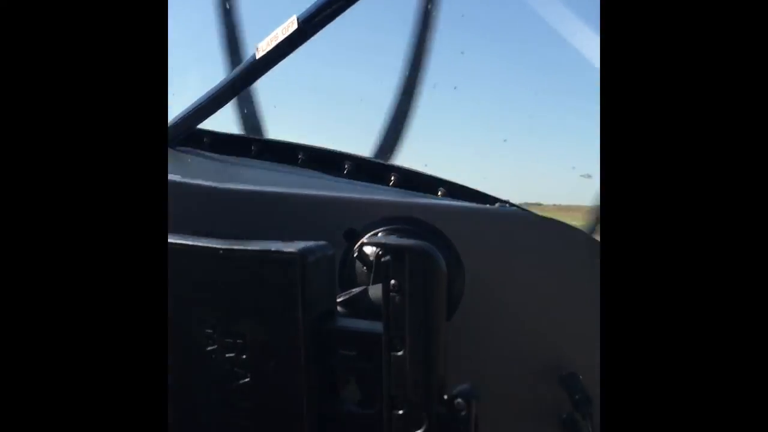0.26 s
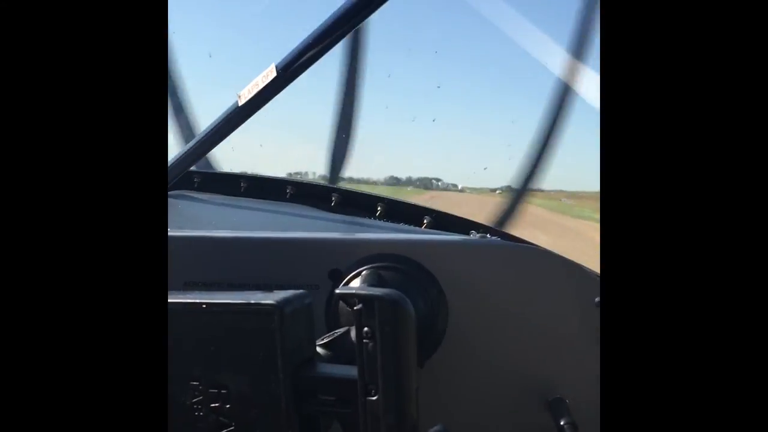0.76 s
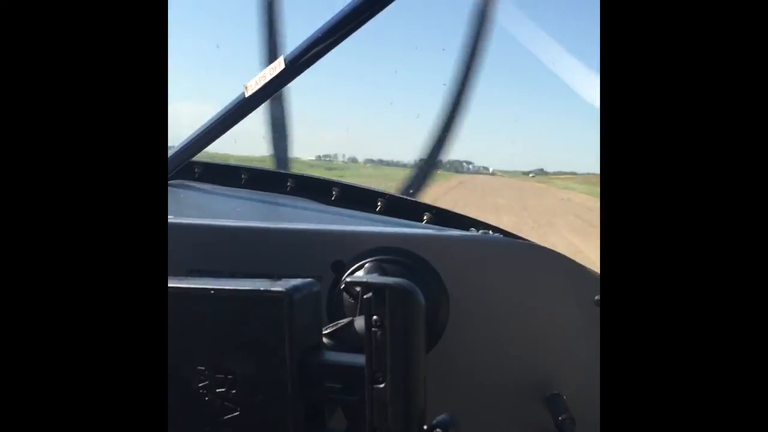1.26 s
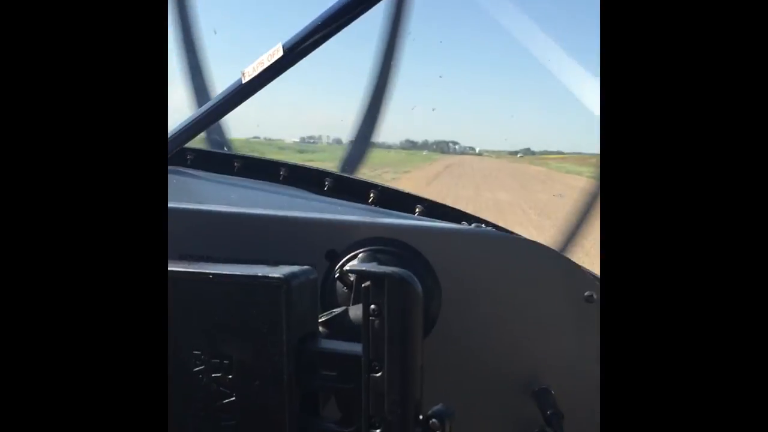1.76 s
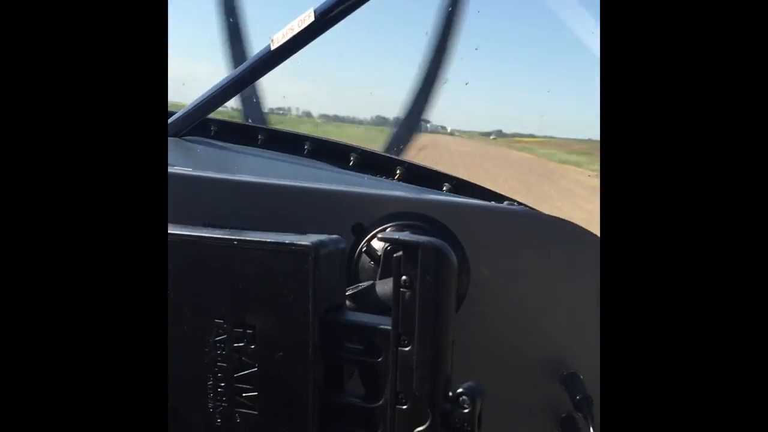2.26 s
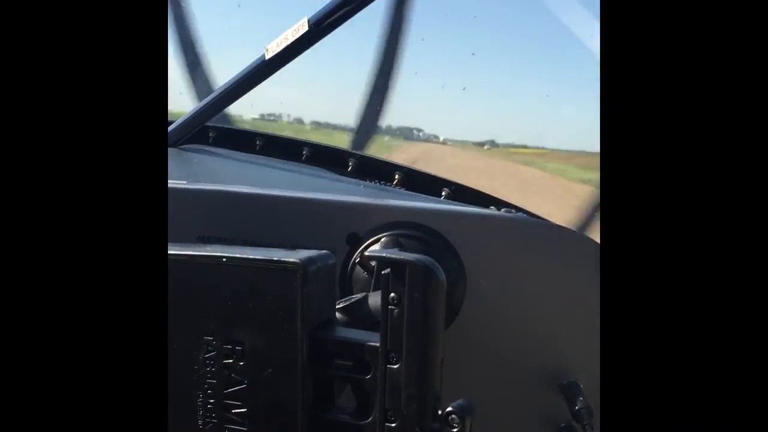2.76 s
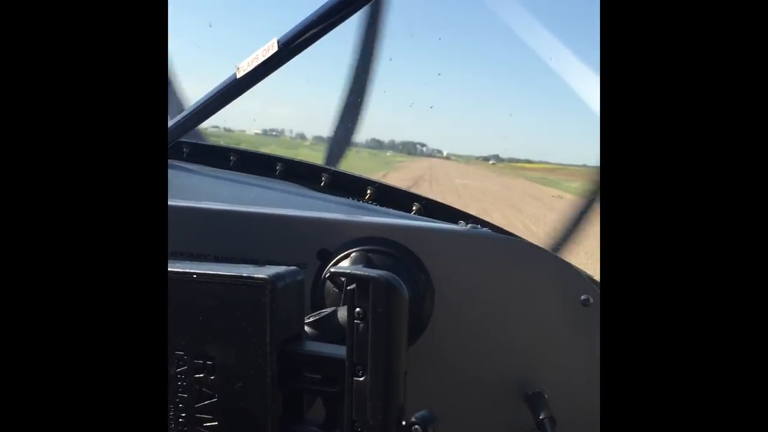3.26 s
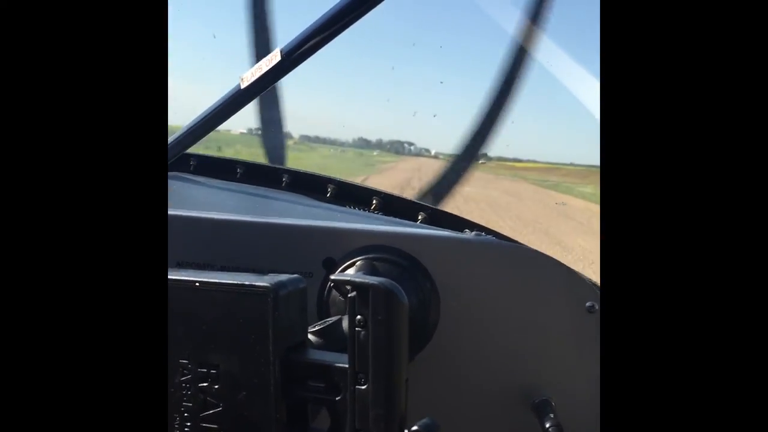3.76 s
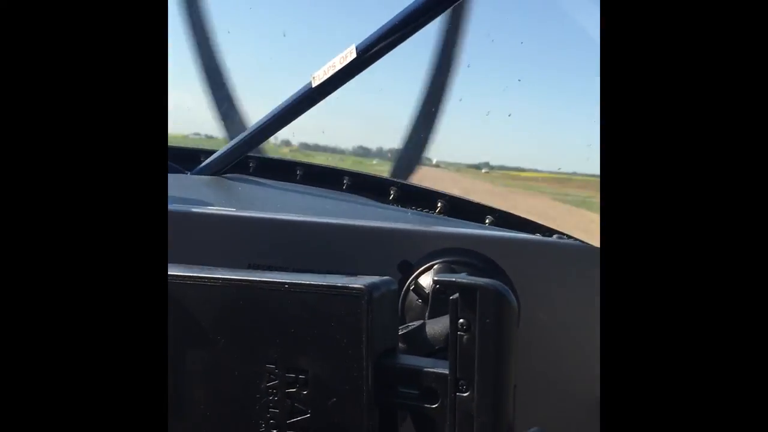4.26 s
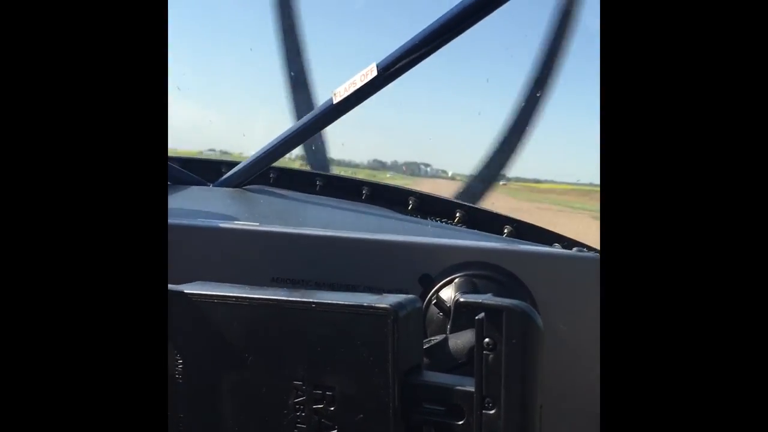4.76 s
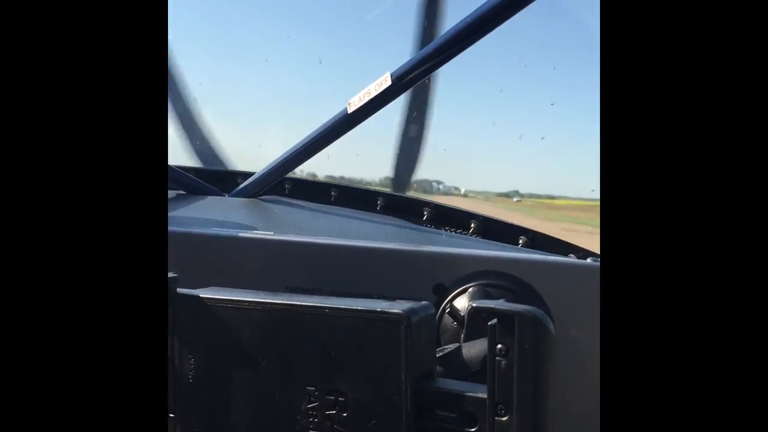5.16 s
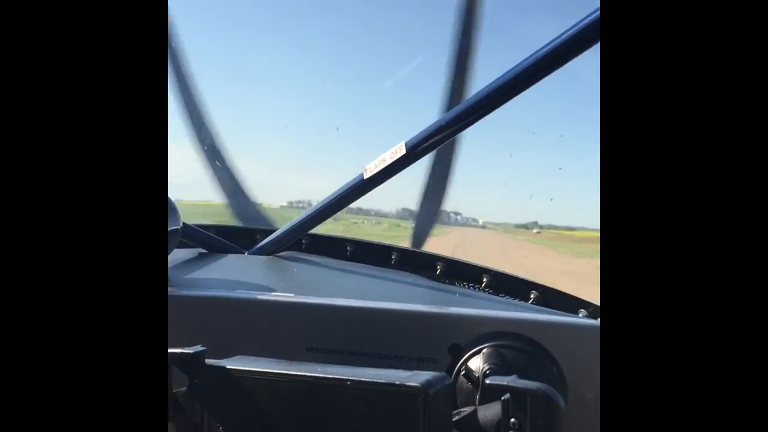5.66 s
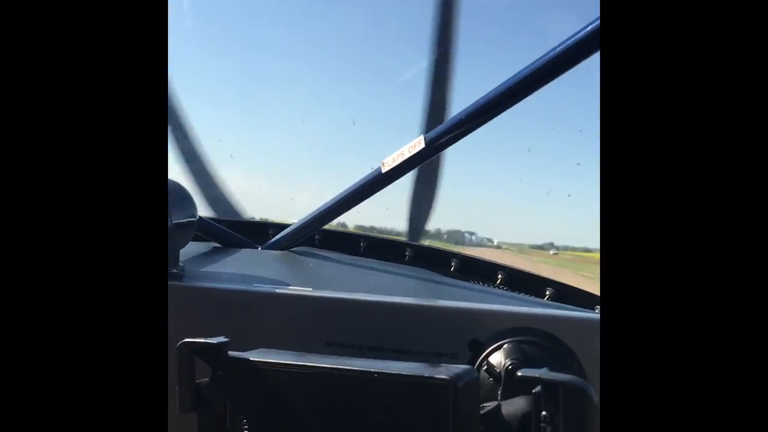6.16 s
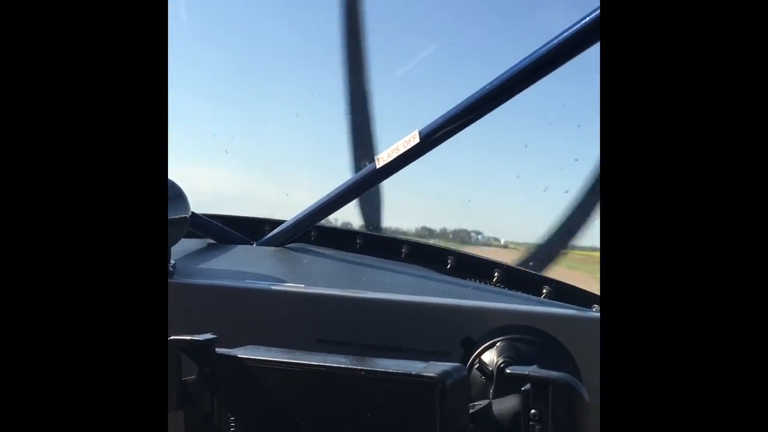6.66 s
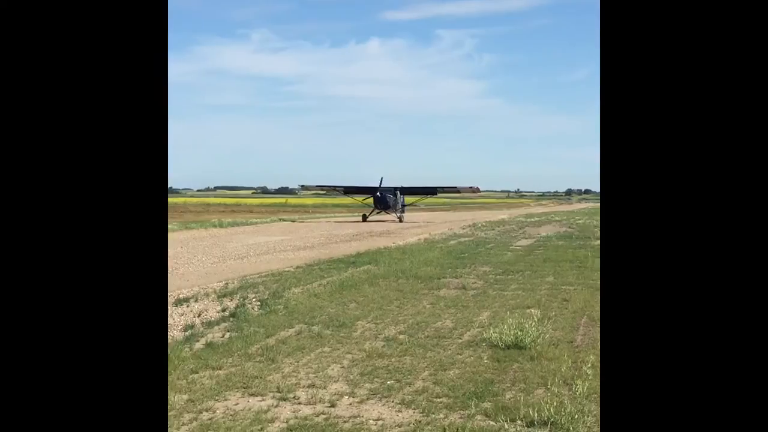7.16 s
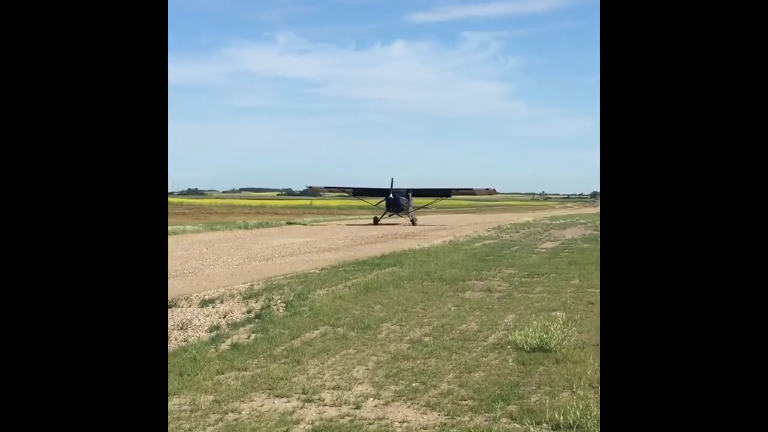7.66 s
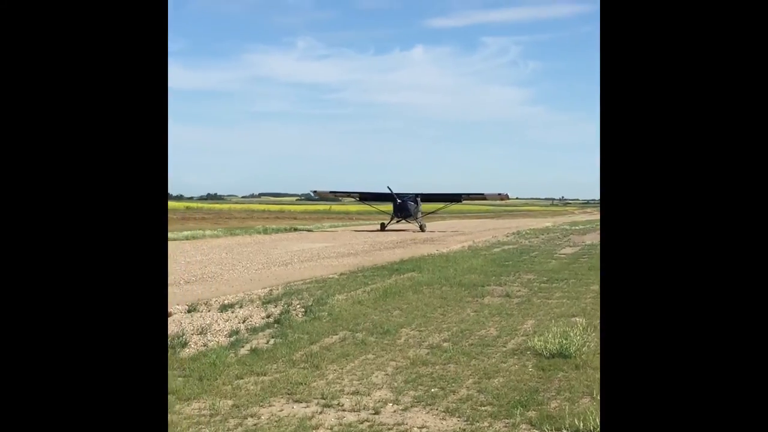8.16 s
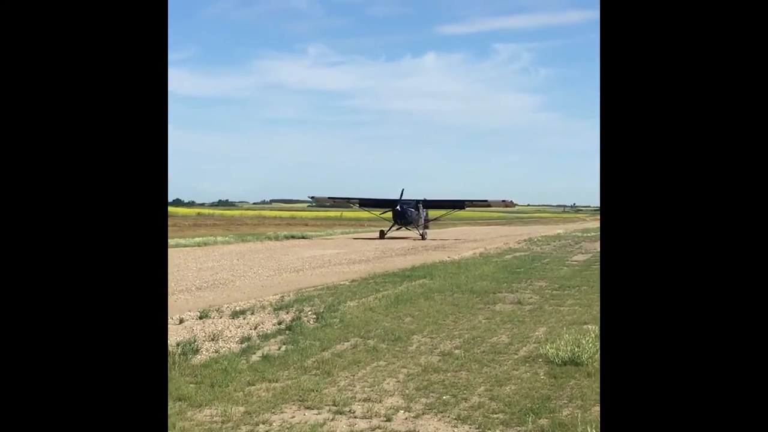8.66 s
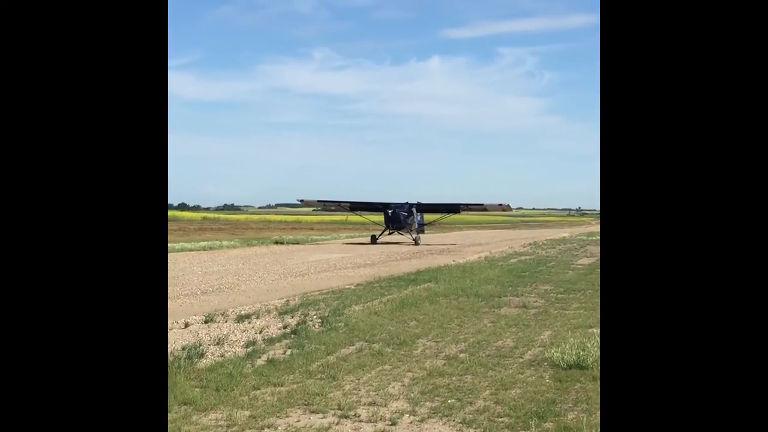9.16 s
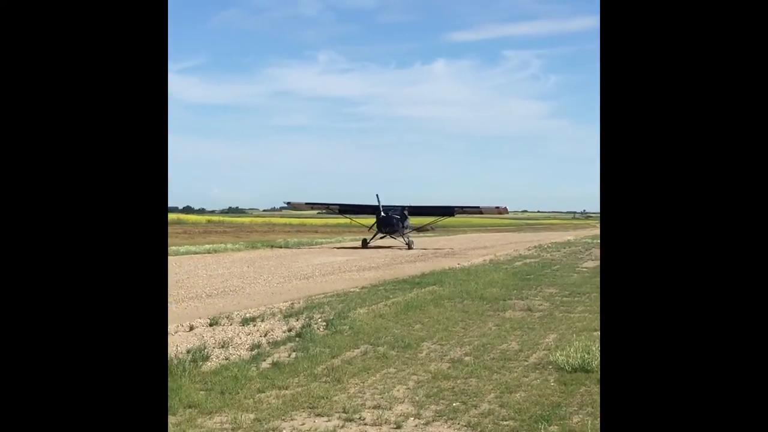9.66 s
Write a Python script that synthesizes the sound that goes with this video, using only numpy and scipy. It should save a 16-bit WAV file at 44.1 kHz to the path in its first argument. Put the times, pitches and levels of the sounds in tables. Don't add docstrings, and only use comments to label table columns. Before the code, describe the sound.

Inside a small propeller plane, a loud low engine drone falls in pitch over four seconds and settles rough, with buffeting, air hiss, a leaking door seal and sharp panel rattles. At about seven seconds it cuts to a much quieter open field: the plane idles closer, exhaust puttering and cowling clattering, stones pinging, wind and a heavy microphone bump.

```python
import sys
import numpy as np
from scipy import signal
from scipy.fft import rfft, irfft, next_fast_len
from scipy.io import wavfile
from scipy.ndimage import uniform_filter1d

SR = 44100
rng = np.random.default_rng(int(sys.argv[2]) if len(sys.argv) > 2 else 0)


def ratio_of_db(decibels):
    return 10 ** (np.asarray(decibels, float) / 20)


def generate_wav(signal):
    frames = np.transpose(np.atleast_2d(signal))
    scaled = np.clip(frames, -1, 1) * 32767
    pcm = np.round(scaled).astype(np.int16)
    wavfile.write(sys.argv[1], SR, pcm)


N = 436590
CUT_S = 7.126
STEP = 64

# time in seconds, shaft speed in Hz, firing tone level in dB.
ENGINE = [(0.0, 54.66, -19), (1.4, 54.28, -16.5), (1.92, 48.62, -20.5), (2.21, 44.82, -16.5),
          (2.71, 43.12, -14.5), (3.22, 42.33, -13.5), (3.46, 40.07, -14.5), (3.89, 35.75, -12.5),
          (4.11, 35.2, -15), (4.71, 34.85, -14.5), (5.32, 32.92, -16), (5.89, 32.4, -14),
          (6.01, 32.48, -14.5), (7.1, 31.58, -16.5)]
# time in seconds, nearness (about 0 far to 1 near, briefly beyond either end).
APPROACH = [(7.14, -.3), (7.3, 0.15), (7.7, 0.3), (8.1, 0.76), (8.4, 0.82), (8.7, 1.1), (9.1, 0.82),
            (9.5, 0.76), (9.9, 0.76)]
# centre in seconds, length in seconds, lift in dB.
BLIPS = [
    (7.4, 0.22, 3.5),
    (8.68, 0.49, 12),
    (9.43, .12, 6.5),
    (9.82, .3, 4),
]


def evened(x):
    return x / np.sqrt(np.mean(x ** 2) + 1e-20)


def read(points, hz):
    f, value = np.transpose(points)
    return np.interp(np.log(hz + 1), np.log(f + 1), value)


def columns(rows, t):
    s, *values = np.transpose(rows)
    return [np.interp(t, s, v) for v in values]


def add(mix, s, sound):
    part = mix[round(s * SR):][:len(sound)]
    part += sound[:len(part)]


def swells(rows, t):
    return sum(height * np.exp(-np.abs(2 * (t - s) / length) ** 3) for s, length, height in rows)


def bells(modes, hz):
    return sum(db / (1 + (2 * (hz - f) / width) ** 2) for f, width, db in modes)


def band(x, low_hz, high_hz):
    edges_hz = [low_hz, min(high_hz, .49 * SR)]
    return signal.sosfilt(signal.butter(2, edges_hz, "bandpass", fs=SR, output="sos"), x)


def wander(t, slow_hz, fast_hz):
    hz = np.geomspace(slow_hz, fast_hz, 16)[:, None]
    coarse_s = np.arange(0, t[-1] + .01, .002)
    sines = np.sin(2 * np.pi * (hz * coarse_s + rng.random(hz.shape))) / np.sqrt(hz)
    return np.interp(t, coarse_s, evened(sines.sum(0)))


def noise(colour_db, size, patchy_db, flicker_db):
    hop = size // 4
    frames = N // hop + 5
    hz = np.fft.rfftfreq(size, 1 / SR)[:, None]
    t = np.arange(frames) * hop / SR
    a, b, patches = rng.standard_normal((frames, len(hz), 3)).T
    patches = uniform_filter1d(patches, size=8, axis=0)
    patches = evened(uniform_filter1d(patches, size=12, axis=1))
    level_db = colour_db(hz, t) + patchy_db * patches + flicker_db * wander(t, 3, 70)
    spectra = (a + 1j * b) * ratio_of_db(level_db)
    return evened(signal.istft(spectra, nperseg=size, noverlap=size - hop)[1][:N])


def rings(rows, rise_s):
    out, t = np.zeros(N), np.arange(22000) / SR
    for s, db, hz, t60_s in rows:
        envelope = ratio_of_db(db - 60 * t / t60_s) * np.minimum(t / rise_s, 1)
        add(out, s, envelope * np.sin(2 * np.pi * hz * t))
    return out


def orders(levels, turns):
    fine = np.arange(N) / STEP
    out = np.zeros(N)
    for k, db in levels:
        level = np.interp(fine, np.arange(len(db)), ratio_of_db(db))
        out += level * np.sin(2 * np.pi * (k * turns + rng.random()))
    return out


def field_hiss():
    return ratio_of_db(-77.5) * evened(band(band(rng.standard_normal(N), 1500, 7500), 900, 8500))


def field_wind(t):
    # frequency in Hz, level in dB per Hz.
    wind_spectrum = [(25, -32), (46, 2), (140, -1), (280, -5.5), (345, -28), (520, -35), (8500, -43.5),
                     (15500, -49)]
    rise_db = 11 * np.clip((t - CUT_S) / 1.05, 0, 1)
    wind_db = -47.5 + rise_db + 1.1 * wander(t, 1.2, 8.7) - 0.18 * swells(BLIPS, t)

    def colour_db(hz, t):
        return read(wind_spectrum, hz) + bells([(405, 40, 22)], hz) * np.clip(1.5 * (8.3 - t), .3, 1)
    return ratio_of_db(wind_db) * noise(colour_db, size=2048, patchy_db=.8, flicker_db=1.2)


def insect(t):
    # phrase centre in seconds, length in seconds, peak in dB.
    insect_phrases = [
        (7.9, .5, -65),
        (8.28, .34, -56),
        (8.55, .2, -65),
        (9.2, 0.98, -62),
    ]
    start_s, period_s = 7.557, .0762
    third_s = period_s / 3
    since_s = t - start_s - .003 + third_s / 2
    strong = np.where(since_s % period_s < third_s, 1, .33)
    ticks = strong * np.exp(-((since_s % third_s - third_s / 2) / .0062) ** 2)
    grit = rng.standard_normal(N)
    scratch = .6 * evened(band(grit, 11300, 13600)) + evened(band(grit, 10600, 15500))
    scratch += .8 * evened(band(grit, 8200, 9300))
    level = swells([(s, length_s, ratio_of_db(db)) for s, length_s, db in insect_phrases], t)
    level = level + ratio_of_db(-86) * (t > start_s)
    return ratio_of_db(-3.5 + 1.5 * wander(t, 2, 13)) * level * ticks * scratch


def skin_buffet(t, gust_db):
    # frequency in Hz, level in dB per Hz.
    buffet_spectrum = [(25, -32), (40, -43), (55, 6), (66, 3), (80, -5), (105, 5), (135, -1), (165, 4),
                       (200, -6), (250, -5), (300, -6.5), (345, -18.5), (450, -21), (700, -56.5)]

    def colour_db(hz, t):
        power = np.clip(columns(ENGINE, t)[0] / 9 - 5, 0, 1)
        return read(buffet_spectrum, hz) + bells([(66, 8.4, 5.4)], hz) * power
    return ratio_of_db(-23 + 0.77 * t + gust_db) * noise(colour_db, size=2048, patchy_db=1.6, flicker_db=0.9)


def slipstream(t, gust_db, slip):
    # frequency in Hz, level in dB per Hz.
    hiss_spectrum = [(250, -17), (350, -1), (420, -7), (480, -8.5), (620, -4), (800, -8.5), (950, -6),
                     (1330, -11.5), (2200, -12.5), (2710, -16), (4500, -20), (8350, -26.5), (11500, -31.5),
                     (15500, -39)]
    flare_db = np.clip((t - 2.413) / .15, 0, 1)
    slip_db = 2.5 * slip + 1.5 * (t < 0.31)
    hiss_db = -33 + 0.1742 * t + flare_db + 0.33 * gust_db + slip_db

    def colour_db(hz, t):
        flutter = np.clip((t - 2.2) / 1.8, 0, 1) * (1 + .35 * wander(t, 4, 25))
        panel_db = bells([(760, 270, 3.0)], hz) * flutter
        octaves_up = np.clip(np.log2(hz / 6500 + 1e-3), 0, 1.2)
        return read(hiss_spectrum, hz) + panel_db + 5 * np.log2(columns(ENGINE, t)[0] / 40) * octaves_up
    return ratio_of_db(hiss_db) * noise(colour_db, size=512, patchy_db=1.0, flicker_db=0.4)


def seal_leak(t, gust_db, slip):
    leak_db = -51 - .3 * gust_db + 7 * slip + 1.4 * wander(t, 1.5, 15)
    return ratio_of_db(leak_db) * evened(band(rng.standard_normal(N), 7150, 8880))


def cabin_air(t):
    # centre in seconds, length in seconds, strength in dB.
    airframe_gusts = [(.3, 0.09, 4), (.41, 0.021, 13.5), (1.1, 0.17, 2.5), (1.75, 0.17, 0.5),
                      (2.6, 0.43, 3), (2.89, 0.094, 3.5), (3.56, .1, 3.5), (3.89, 0.074, 5.5),
                      (4.23, 0.14, 1.5), (4.5, .1, -3), (5.42, 0.086, 3), (5.81, 0.14, 3.5),
                      (5.99, 0.074, 6), (6.49, 0.089, 3), (6.6, .1, 4.5), (6.92, 0.092, 1.5),
                      (7.09, 0.061, 4.5)]
    gust_db = swells(airframe_gusts, t)
    slip = np.clip(.5 + (1 - t) / 0.68, 0, 1)
    return skin_buffet(t, gust_db) + slipstream(t, gust_db, slip) + seal_leak(t, gust_db, slip)


def rattles():
    # start in seconds, peak in dB, level of the lower part in dB.
    rattle_events = [(0.3546, -22, -24), (0.409, -40, -22.5), (0.9314, -25, -25), (0.956, -36, -32),
                     (1.4346, -28, -25), (1.9545, -26, -25), (2.5274, -37, -29), (2.5701, -36, -24.5),
                     (3.1486, -30, -24), (4.346, -38, -32), (4.5309, -29, -30), (4.8228, -40, -35),
                     (4.9789, -39, -40), (5.7513, -36, -26), (5.8137, -33, -27), (6.02, -37, -24),
                     (6.0494, -25, -31), (6.243, -36, -35), (6.4967, -36, -37), (6.5301, -38, -27),
                     (6.6219, -41, -35)]
    out, t = np.zeros(N), np.arange(2600) / SR
    for s, db, low_db in rattle_events:
        grit = rng.standard_normal((2, len(t)))
        bright = ratio_of_db(db - 7.5) * evened(band(grit[0], 6500, 15500)) * np.exp(-t / 0.0044)
        buzz = ratio_of_db(low_db - 6) * evened(band(grit[1], 1200, 5900)) * np.exp(-t / 0.0098)
        add(out, s, (bright + buzz) * np.minimum(t / 0.00093, 1))
    return out


def panel_knocks():
    return rings([(0, -28.5, 429, 1.3), (.257, -21.5, 710, .14), (.285, -20, 786, .1),
                  (.283, -18, 400, 0.11), (.311, -23, 730, 0.15), (.404, -24, 630, 0.076),
                  (.404, -26, 800, .07), (.408, -28, 1940, 0.074), (.408, -23, 1320, 0.046),
                  (.94, -20, 640, .08), (4.88, -24, 729, 0.15), (4.93, -24, 710, 0.14),
                  (5.78, -20, 724, .1), (5.95, -25, 760, 0.17)], rise_s=.007)


def microphone_bumps():
    return rings([(7.59, -25.5, 62, .12), (8.152, -24, 444, 0.043), (8.154, -24, 66, 0.17),
                  (8.155, -22.5, 284, 0.078), (8.156, -32, 640, 0.047), (8.1605, -12.5, 150, 0.07),
                  (8.1705, -10, 143, 0.086), (8.185, -18, 420, 0.031), (8.188, -32, 655, .04),
                  (8.194, -15, 111, 0.06), (9.44, -21, 68, 0.14)], rise_s=0.0051)


def wheel_pings():
    return rings([(7.163, -43, 772, 0.053), (7.228, -47, 760, 0.067), (7.295, -47, 760, .05),
                  (7.39, -50, 950, .05), (7.422, -43, 770, .06), (7.33, -56, 2700, .04),
                  (7.46, -57, 2720, .05), (7.48, -51, 1250, 0.056), (7.643, -54, 1100, 0.036),
                  (7.708, -40, 1150, .04), (7.795, -47, 1340, .04), (7.867, -40, 1330, .04),
                  (8.933, -35, 1350, 0.043)], rise_s=0.0014)


def cowling_clatter(t, turns):
    # frequency in Hz, level in dB per Hz.
    clatter_spectrum = [(210, -37), (350, -8), (1230, -8.5), (1350, -6), (1480, -9.5), (2710, -7.5),
                        (4430, -13), (6080, -16.5), (7840, -23.5), (13200, -64), (15500, -58)]
    # frequency in Hz, width in Hz, lift in dB.
    cowling_modes = [(770, 27, 6), (1350, 36, 15.5), (1864, 94, 8), (2720, 82, 7), (3500, 180, 4.5),
                     (4480, 120, -9), (4730, 90, 7), (5000, 120, -6), (5400, 90, 2), (6160, 95, 9),
                     (6760, 90, 9.5), (7900, 500, -5), (8700, 700, 10.5)]

    def colour_db(hz, t):
        near = columns(APPROACH, t)[0]
        opened_s = np.maximum(t - CUT_S, 0)
        treble_db = -19.5 + 18.5 * np.tanh((opened_s / 1.38 * 1.3) ** 1.12)
        octaves_up = np.clip(np.log2(hz / 1000 + 1e-3) / 1.07, 0, 1.4)
        air_db = -30 * np.log2(np.maximum(hz, 9000) / 9000)
        slope_db = read(clatter_spectrum, np.minimum(hz, 9000)) + air_db
        peaks_db = bells(cowling_modes, hz) * np.clip(0.59 + .5 * near, 0, 1.2)
        return slope_db + peaks_db + 6.5 * near + treble_db * octaves_up
    clatter = noise(colour_db, size=1024, patchy_db=1.9, flicker_db=1.2)
    near_rms = np.sqrt(np.mean(clatter[t > 8.5] ** 2))
    throb = 1 + .15 * np.cos(2 * np.pi * turns)
    return clatter / near_rms * ratio_of_db(-44) * throb


def exhaust(t, turns):
    # shaft multiple, level in dB.
    exhaust_orders = [(1, -22), (2, 0), (3, -11), (4, -5), (5, -6), (6, -3.5), (7, -9), (8, -5), (9, -11),
                      (10, -24)]
    exhaust_db = -46 + 1.5 * columns(APPROACH, t)[0] + swells(BLIPS, t)
    levels = [(k, db + 1.2 * wander(t[::STEP], 0.86, 8.4)) for k, db in exhaust_orders]
    return ratio_of_db(exhaust_db) * orders(levels, turns)


def taxi(t):
    idle_hz = 31.83 * (1 + 0.0013 * wander(t, 0.502, 7.6))
    turns = np.cumsum(idle_hz) / SR
    return cowling_clatter(t, turns) + exhaust(t, turns)


def cabin_engine(t):
    # frequency in Hz, gain in dB.
    cabin_gain = [(30, -17.5), (55, 4.5), (126, -9), (140, 1), (160, -4.5), (180, -14), (215, -7.5),
                  (250, -3.5), (277, 1.5), (297, -3), (330, -10.5), (375, -26.5), (450, -29.5), (1200, -39)]
    # shaft multiple, level in dB.
    uneven_orders = [(3, -9.5), (4, 2), (5, 2.5), (6, -1), (7, 0.5), (8, 0), (9, -7), (10, -14)]
    # shaft multiple, level at full speed in dB.
    whine_orders = [(1, -35), (7, -47), (8, -43), (10, -49), (11, -40.5), (12, -48), (14, -49), (17, -45),
                    (21, -49)]
    # centre in seconds, length in seconds, change in dB.
    windmilling = [
        (2.95, 0.75, -3),
        (3.75, 0.48, -2.5),
        (5.2, 0.8, 2),
    ]
    turns = np.cumsum(columns(ENGINE, t)[0] * (1 + 0.0012 * wander(t, 1, 10))) / SR
    t = t[::STEP]
    shaft_hz, firing_db = columns(ENGINE, t)
    octaves = np.log2(shaft_hz / shaft_hz[0])
    orders_db = -21 + 6 * octaves + swells(windmilling, t)
    levels = [(2, firing_db + 0.6 * wander(t, 2, 20))]
    for k, db in uneven_orders:
        levels.append((k, orders_db + db + read(cabin_gain, k * shaft_hz) + 1.2 * wander(t, 1, 18)))
    for k, db in whine_orders:
        power_db = 24 * octaves * max(1, k / 7) ** 1.2
        levels.append((k, db + power_db + 1.5 * wander(t, 0.65, 10.4)))
    return np.sqrt(2) * orders(levels, turns)


def scene():
    t = np.arange(N) / SR
    inside = np.clip((CUT_S - t) / 0.031, 0, 1) ** 1.1
    outside = np.clip((t - CUT_S) / 0.03, 0, 1)
    cabin = cabin_air(t) + rattles() + panel_knocks() + cabin_engine(t)
    field = field_hiss() + field_wind(t) + insect(t) + microphone_bumps() + wheel_pings() + taxi(t)
    return (inside * cabin + outside * field)[None]


def low_pass(x):
    return signal.sosfilt(signal.butter(12, 15670, fs=SR, output="sos"), x)


def record(dry):
    # frequency in Hz, width in Hz, depth in dB.
    port_dips = [(4930, 180, -3), (7400, 920, -2.5), (10550, 680, -4)]
    size = next_fast_len(N)
    hz = np.fft.rfftfreq(size, 1 / SR)
    response = ratio_of_db(bells(port_dips, hz)) * (hz < 15300)
    heard = irfft(rfft(dry, size) * response, size)[:, :N]
    return low_pass(1.3 * np.tanh(heard / 1.3))


dry = scene()
out = record(dry)
generate_wav(out)
```